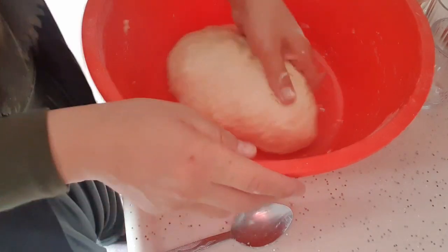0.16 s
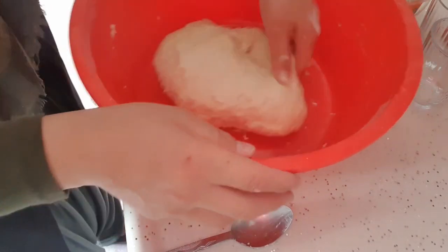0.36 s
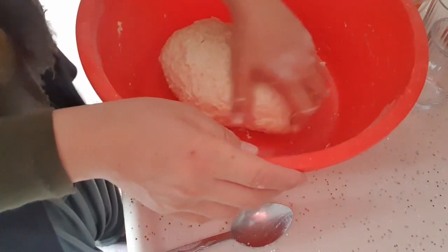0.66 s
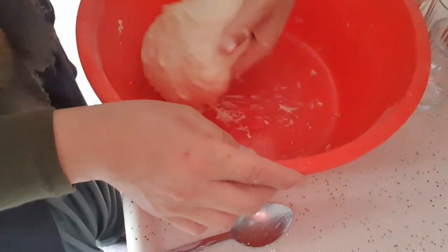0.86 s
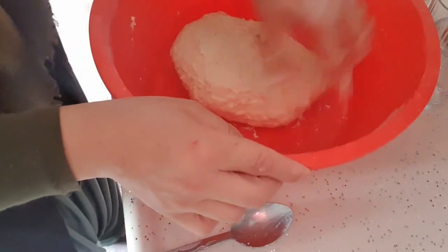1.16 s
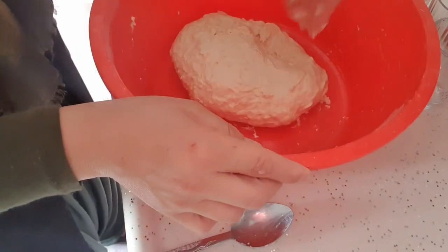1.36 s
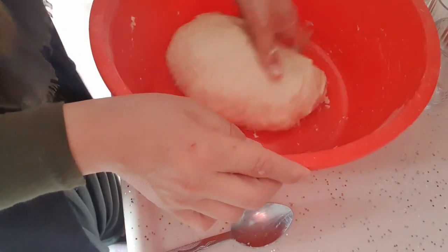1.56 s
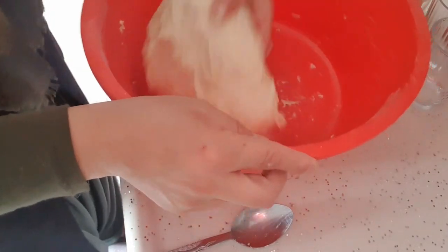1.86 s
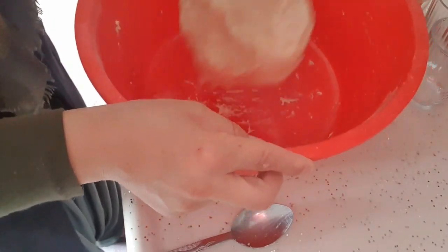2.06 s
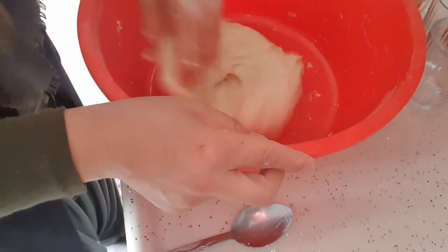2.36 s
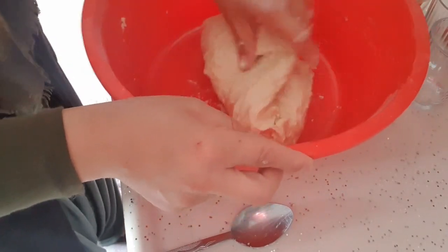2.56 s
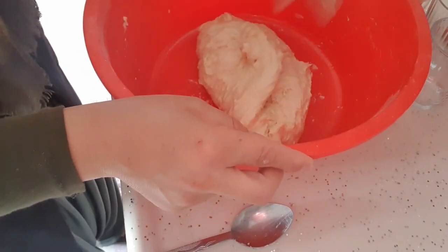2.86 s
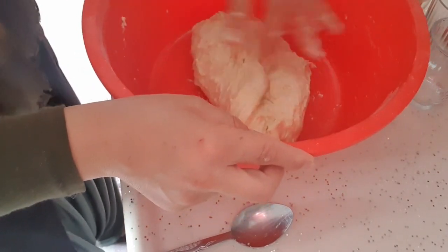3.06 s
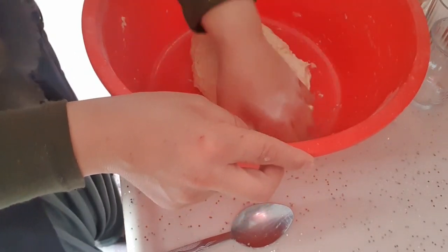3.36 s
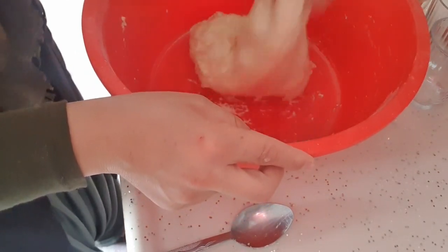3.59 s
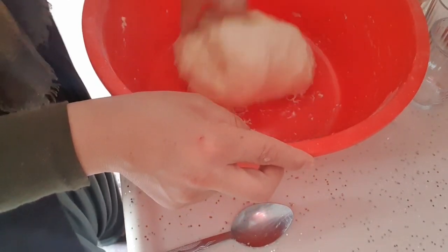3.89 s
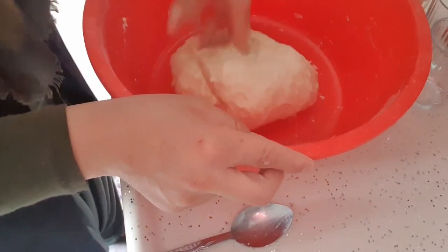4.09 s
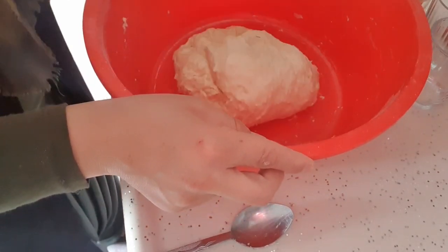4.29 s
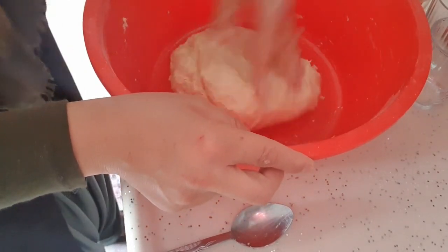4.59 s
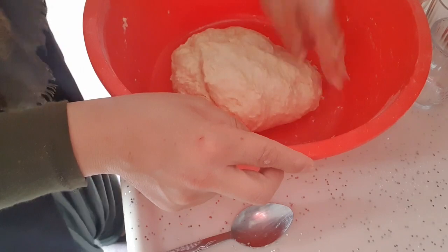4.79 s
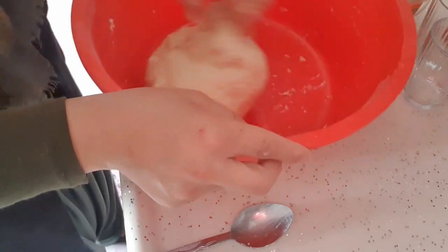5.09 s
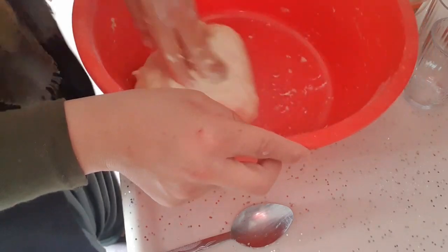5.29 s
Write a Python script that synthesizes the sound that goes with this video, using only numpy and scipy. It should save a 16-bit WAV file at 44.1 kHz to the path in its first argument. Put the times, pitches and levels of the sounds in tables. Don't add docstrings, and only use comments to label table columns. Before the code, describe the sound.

Hands knead soft sticky dough in a plastic bowl: irregular wet slaps, hollow thuds and slick drags, fading to faint sticky ticks.

```python
import sys
import numpy as np
from scipy import signal
from scipy.fft import rfft, irfft, next_fast_len
from scipy.io import wavfile

SR = 44100
rng = np.random.default_rng(int(sys.argv[2]) if len(sys.argv) > 2 else 0)


def volts(x):
    e = np.asarray(x, float) / 20
    return 10 ** e


def generate_wav(sig):
    pcm = np.round(np.clip(np.atleast_2d(sig).T, -1, 1) * 32767).astype(np.int16)
    wavfile.write(sys.argv[1], SR, pcm)


N = 239859


def rms_one(x):
    return x / np.sqrt(np.mean(x ** 2) + 1e-20)


def panned(level_db, pan_db):
    return volts(level_db + np.outer([.5, -.5], pan_db))


def coloured(x, points):
    hz, level_db = np.transpose(points)
    size = next_fast_len(N)
    grid_hz = np.arange(size // 2 + 1) * SR / size + 1
    gain = volts(np.interp(np.log(grid_hz), np.log(hz), level_db))
    return irfft(rfft(x, size) * gain, size)[..., :N]


def drift(rate):
    r = np.exp(-80 * np.pi * rate / SR)
    slow = signal.lfilter([1], [1, -2 * r, r * r], rng.standard_normal(N // 40 + 2002))
    slow = rms_one(slow[2000:])
    return np.interp(np.arange(N) / 40, np.arange(len(slow)), slow)


def ring(x, hz, t60):
    r, w = volts(-60 / (t60 * SR)), 2 * np.pi * hz / SR
    return signal.lfilter([0, np.sin(w)], [1, -2 * r * np.cos(w), r * r], x + 1e-18)


def resonance(x, hz, width_hz):
    r, w = np.exp(-np.pi * width_hz / SR), 2 * np.pi * hz / SR
    return signal.lfilter([(1 - r * r) / 2, 0, (r * r - 1) / 2], [1, -2 * r * np.cos(w), r * r], x + 1e-18)


def pair(alike):
    mid, side = rng.standard_normal((2, N))
    alike = np.clip(alike, 0, 1)
    return np.sqrt(alike) * mid + np.sqrt(1 - alike) * side * np.array([[1], [-1]])


def struck(events, column, modes, contact_s, spread_db, trim_db, pitch_column=None, narrow_db=0., wide=1.):
    hits = np.array(events)
    out = np.zeros((2, N))
    chance = rng.standard_normal((40, len(modes), 3))[:len(hits)]
    push = np.hanning(int(contact_s * SR) + 3)
    for k, (hz, level_db, t60) in enumerate(modes):
        strength, side, delay = chance[:, k].T
        octaves_away = np.abs(np.log2(hz / hits[:, pitch_column])) if pitch_column else 0
        level = hits[:, column] + level_db + trim_db - narrow_db * octaves_away + spread_db * strength
        at = ((hits[:, 0] + .4 * np.abs(delay) / hz) * SR).astype(int)
        clicks = np.zeros((2, N))
        clicks[:, at] = panned(level, wide * (hits[:, -1] + 2.3 * side))
        out += ring(clicks, hz, t60)
    return signal.lfilter(push / push.sum(), [1], out)


# (time [s], floor boom [dB], worktop [dB], floor overtones [dB], left-right [dB])
FLOOR_BLOWS = [(0.094, -29, -42, -50.5, -7), (0.128, -50.5, -34.5, -60.5, 0.5),
               (0.282, -13.5, -42.5, -21.5, -10), (0.317, -28, -37.5, -26.5, 4),
               (0.38, -41, -51.5, -40.5, -3), (0.551, -40.5, -60.5, -69, 2), (0.695, -36, -44, -61.5, 7),
               (1.015, -18, -39, -34.5, 6.5), (1.067, -38, -39.5, -46.5, -11),
               (1.138, -37, -44.5, -56.5, -5.5), (1.525, -21.5, -38, -17.5, 2), (1.54, -25, -32.5, -19, -1),
               (1.555, -15.5, -49.5, -19.5, 2), (2.288, -35, -44, -51, -3), (2.408, -30, -29, -36.5, 0),
               (2.43, -36, -28.5, -33, 8), (2.55, -51, -34, -48.5, 1), (2.991, -49, -53, -58.5, -1),
               (3.321, -24, -30, -45, -4), (3.5, -48, -55.5, -57, -0.5), (4.209, -53, -61.5, -54.5, 1.5),
               (4.461, -48, -45.5, -44.5, 4.5), (4.482, -41.5, -54, -56, 0), (4.902, -38, -36, -50, -5)]
# (frequency [Hz], level [dB], t60 [s])
WORKTOP_MODES = [(47.2, -12, 0.34), (67.7, 0.5, 0.21)]
# (frequency [Hz], level [dB], t60 [s])
FLOOR_MODES = [(117.49, -4, 0.28), (138.58, 3.5, 0.19), (154, 6, 0.11), (220, 2.5, 0.16), (262, -6.5, 0.11),
               (296.3, -2.5, 0.068), (327.2, -3.5, 0.055), (358.3, -5, 0.14)]


def thuds():
    worktop = struck(FLOOR_BLOWS, 2, WORKTOP_MODES, 0.0082, 2.2, 4.7, wide=.1)
    boom = struck(FLOOR_BLOWS, 1, FLOOR_MODES[:3], 0.0022, 2.4, -7.0, wide=.15)
    overtones = struck(FLOOR_BLOWS, 3, FLOOR_MODES[3:], .0015, 3.3, -1.0, wide=.5)
    return worktop + boom + overtones


# (time [s], wall [dB], strongest pitch [Hz], wet smack [dB], left-right [dB])
WALL_HITS = [(0.094, -24, 564.3, -41.5, 4.5), (0.282, -16, 750, -30.5, 2.5), (0.317, -28, 486, -46, 3.5),
             (0.3805, -26, 789, -41, 9), (0.402, -29.5, 1247, -41.5, 3.5), (0.4185, -28, 1174, -45, 8.5),
             (0.715, -38, 1132, -40, -1.5), (0.74, -49, 687, -40.5, 4), (1.0145, -18.5, 451.4, -31, 4.5),
             (1.511, -28, 1200, -43, 4), (1.524, -23, 461, -40, 10), (1.5405, -18, 700, -37, -3),
             (1.554, -17, 833, -34, 4), (1.564, -16, 716, -37, 5), (1.891, -41, 737, -48.5, -0.5),
             (2.286, -41.5, 1243, -62, 4.5), (2.409, -12, 989.6, -21, 8), (2.413, -11, 490, -28, -0.5),
             (2.442, -24, 1000, -37, 1.0), (2.992, -51, 472, -57.5, 4.5), (3.32, -39, 800, -62, 2),
             (3.351, -41, 580, -56, 5.5), (4.46, -46, 600, -60, 3.5), (4.909, -56, 500, -64, 0.5)]
# (frequency [Hz], level [dB], t60 [s])
WALL_MODES = [(474, -1.5, 0.066), (598, -4, 0.12), (743.5, -5, 0.092), (816, 0, 0.0708), (875, -2, 0.028),
              (1006.1, 1.5, 0.042), (1222.2, 1.5, 0.045), (1337.3, 0.5, 0.054), (1529, -1, 0.069),
              (1660, -2, 0.05), (1830, -6, .04), (2060, -7, .045), (2360, -6, .045), (2740, -10, .04)]


def wall_knocks():
    return struck(WALL_HITS, 1, WALL_MODES, .0004, 2.2, -14.5, pitch_column=2, narrow_db=6.0, wide=0.63)


def air_pops():
    out, t = np.zeros((2, N)), np.arange(900) / SR
    for s, db, hz, _, pan_db in WALL_HITS:
        cycles = hz * t
        swell = cycles / 1.3 * np.exp(1 - cycles / 1.3)
        at = int(s * SR)
        out[:, at:at + 900] += panned(db - 7.0, pan_db) * np.sin(2 * np.pi * cycles) * swell
    return out


def smack_burst(shape, burst_s, trim_db):
    hits = np.array(WALL_HITS)
    starts = np.zeros((2, N))
    starts[:, (hits[:, 0] * SR).astype(int)] = panned(hits[:, 3] + trim_db, hits[:, -1])
    fall, rise = np.exp(-1 / (burst_s * SR)), np.exp(-1 / (.0007 * SR))
    envelope = signal.lfilter([1], [1, -fall], starts)
    burst = signal.lfilter([1 - rise], [1, -rise], envelope) * pair(0.54)
    out = 0
    for k, (hz, width_hz, db) in enumerate(shape):
        band = resonance(resonance(burst, hz, width_hz), hz, 2 * width_hz)
        out = out + volts(db) * band * (-1) ** k
    return out


# (frequency [Hz], width [Hz], level [dB])
SMACK_BANDS = [(1600, 720, 2), (2200, 700, 2), (2650, 960, 3), (3300, 1100, -3), (4260, 2200, -10),
               (5519, 1400, -9.5), (6400, 900, -6.5)]


def smacks():
    body = smack_burst(SMACK_BANDS, burst_s=0.004, trim_db=16.5)
    return body + smack_burst([(10500, 5000, 0.0081)], burst_s=0.0032, trim_db=-9.5)


# (time [s], level [dB], pitch [Hz], t60 [s], left-right [dB])
HOLLOWS = [(0.2855, -20, 1190, .03, 2), (0.289, -24, 1690, .03, 2), (0.404, -34, 1240, .04, 3),
           (0.419, -27, 1150, .04, 6), (0.44, -40, 1500, .04, 4), (1.0145, -24, 1250, .03, 3),
           (1.023, -28, 800, .04, 3), (1.526, -26, 1150, .04, 4), (1.5408, -6, 830, .03, -2),
           (1.5415, -14, 640, .06, 2), (1.549, -18, 800, .03, 1), (1.5548, -8, 840, .03, 3),
           (1.556, -18, 650, .06, 0), (1.559, -20, 1350, .03, 3), (2.4112, -3, 1000, .014, 0),
           (2.4125, -21, 1030, .05, 3), (2.412, -15, 440, .035, 1), (2.4105, -20, 2360, .035, 0),
           (2.421, -22, 1640, .04, -2), (2.426, -26, 2500, .03, 0), (2.4105, -24, 6400, .012, 2),
           (0.2835, -15, 400, .05, 2), (1.5415, -22, 1600, .03, 0), (1.5555, -22, 1550, .03, 2),
           (1.572, -25, 1400, .02, 2), (1.579, -29, 2500, .025, 2), (4.463, -44, 780, .05, 2),
           (4.484, -43, 500, .07, 1), (2.416, -18, 790, .06, -1), (2.418, -18, 1430, .04, 2),
           (5.01, -50, 1250, .05, 1), (5.032, -49, 1400, .05, 1), (5.052, -52, 1250, .06, 1),
           (5.103, -51, 1300, .04, 1)]


def pockets():
    out, t = np.zeros((2, N)), np.arange(4000) / SR
    for s, db, hz, t60, pan_db in HOLLOWS:
        at = int(s * SR)
        note = np.sin(2 * np.pi * hz * t) * (1 - np.exp(-t * hz)) * volts(db - 60 * t / t60)
        out[:, at:at + 4000] += note * panned(0, pan_db)
    return out


# (time [s], level [dB], pitch [Hz], ring width [share of pitch])
STRANDS = [(0.2056, -42, 1680, .2), (0.4185, -28, 3500, .6), (0.442, -34, 2600, .15),
           (0.8534, -38, 3130, .08), (0.9364, -46, 1840, .12), (1.0155, -30, 5410, .12),
           (1.0165, -28, 3200, .15), (1.565, -26, 2450, .12), (1.7755, -36, 3780, .18),
           (2.656, -60, 7000, .5), (2.7194, -62, 5500, .4), (2.7862, -56, 4500, .5),
           (2.942, -58, 2300, .18), (2.9776, -55, 1500, .3), (3.6287, -60, 4510, .3),
           (3.6745, -63, 4900, .3), (3.7249, -63, 5940, .3), (3.7498, -58.5, 13500, .18),
           (3.776, -65, 5000, .3), (3.81, -60, 11000, .6), (3.8385, -61, 9000, .8), (3.8576, -63, 4500, .4),
           (3.8969, -59, 6140, .08), (3.9515, -59, 12500, .3), (3.979, -54, 12300, .15),
           (3.9958, -54, 6420, .15), (4.0262, -54, 4300, .25), (4.0285, -48, 11900, .3),
           (4.046, -53, 4500, .4), (4.057, -54, 6000, .6), (4.084, -54, 11500, .15),
           (4.0925, -51, 4800, .35), (4.1634, -50, 4000, .25), (4.1899, -52, 4407, .2),
           (4.463, -38, 5000, .2), (4.5442, -53, 4800, .3), (4.578, -54, 12500, .3),
           (4.6015, -53, 11500, .4), (4.6325, -50, 12300, .3), (4.6745, -46, 11400, .35),
           (4.675, -52, 5900, .15), (5.0136, -47, 2920, .2), (5.104, -50, 4300, .2),
           (5.117, -47, 7200, .25), (5.137, -50, 4800, .12), (5.285, -62, 7000, .4),
           (5.3952, -63, 5620, .3), (5.4244, -63.5, 2190, .18)]


def ticks():
    out, t = np.zeros((2, N)), np.arange(400) / SR
    sides_db = rng.normal(1.5, 1.2, 60)
    for (s, db, hz, width_share), pan_db in zip(STRANDS, sides_db):
        width_hz = width_share * hz
        snap = np.sqrt(width_hz / 600.) * np.sin(2 * np.pi * hz * t) * np.exp(-np.pi * width_hz * t)
        at = int(s * SR)
        out[:, at:at + 400] += panned(db - 1.5, 2 * pan_db) * snap[:N - at]
    return out


# (time [s], wall drag [dB], oily hiss [dB], floor drag [dB], time to fade 60 dB [s])
SKID_STROKES = [(0.0, -65.5, -68, -85.5, 0.89), (0.093, -31, -46.5, -57.5, 0.4244),
                (0.285, -30, -44.5, -27.5, 0.3149), (0.381, -40, -42.5, -53, 0.2),
                (0.704, -57, -59, -71.5, 0.41), (0.715, -45, -48.5, -74.5, 0.3328),
                (1.009, -49.5, -52.5, -53, 0.3276), (1.016, -34, -55.5, -32.5, 0.2938),
                (1.511, -44, -56, -66.5, 0.39), (1.531, -30, -42, -28, 0.5573),
                (2.289, -51, -80, -53.5, 0.32), (2.407, -44, -52, -50, .5), (2.412, -29, -36, -29, 0.4206),
                (2.99, -65.5, -57.5, -62.5, 0.1334), (3.325, -54, -78.5, -46, 0.6743),
                (3.355, -53.5, -56, -58.5, 0.5738), (4.205, -76, -72.5, -58, 0.31),
                (4.462, -56, -56, -42, .4), (4.902, -66, -62, -65, .3), (4.909, -65, -59, -55, 0.6),
                (4.63, -85, -84, -59, 0.91), (5.329, -70, -79.5, -65, 0.72)]
# (peak time [s], swell [s], wall drag [dB], peel fizz [dB], time to fade 60 dB [s])
PEEL_STROKES = [(0.249, 0.083, -46.5, -60.5, 0.4371), (0.431, 0.069, -39, -68, 0.1954),
                (0.67, .04, -70, -98, .4), (0.882, 0.094, -50.5, -64.5, 0.4727), (0.99, .04, -57, -78, .3),
                (1.078, 0.05, -48, -64.5, 0.448), (1.166, 0.0694, -48.5, -67, .24),
                (1.28, .05, -70, -100, .4), (1.567, 0.0263, -36.5, -50, 0.3829),
                (1.72, .1, -55, -62.5, 0.6046), (1.9, 0.126, -52.5, -70, 0.5353),
                (2.62, .12, -62.5, -76, 0.45), (2.794, .02, -75, -85, 0.54), (3.09, .06, -66, -88, .3),
                (3.096, 0.0599, -76, -67, 0.2768), (3.501, 0.0404, -52.5, -69, 0.2437),
                (3.62, 0.104, -75, -77.5, 1.5), (4.011, 0.0486, -75, -71.5, 1.06),
                (4.09, 0.0518, -61, -70, 0.336), (4.21, 0.178, -82, -72, 0.13), (4.48, .02, -70, -68, .5),
                (4.675, 0.099, -68.5, -67.5, 0.273), (5.061, 0.0979, -53, -64, 0.578),
                (5.139, 0.086, -65, -67.5, 0.33), (5.43, 0.034, -83.5, -74.5, 0.14)]
# (wall [dB], hiss [dB], fizz [dB], floor [dB])
REST_DB = (-99, -101, -105, -84)


def strokes():
    t = np.arange(0, N / SR, .001)
    power = volts(2 * np.array(REST_DB))[:, None] * np.ones(len(t))
    faster = np.array([[1], [1], [1], [1.3]])
    for s, wall_db, hiss_db, floor_db, t60 in SKID_STROKES:
        fade_db = 60 * np.maximum(t - s, 0) / t60 * faster
        levels_db = np.array([[wall_db], [hiss_db], [hiss_db - 17], [floor_db]])
        power += (t >= s) * volts(2 * (levels_db - fade_db))
    for s, swell_s, wall_db, fizz_db, t60 in PEEL_STROKES:
        away_db = np.where(t < s, 10 * ((s - t) / swell_s) ** 2, 60 * (t - s) / t60)
        hiss_db = fizz_db + .55 * (wall_db - fizz_db) + 2
        levels_db = np.array([[wall_db], [hiss_db], [fizz_db], [wall_db - 20]])
        power += volts(2 * (levels_db - away_db))
    return [np.interp(np.arange(N) / SR, t, gain) for gain in np.sqrt(power)]


def grains(per_s, size_db):
    sizes = volts(size_db * np.minimum(rng.exponential(1, N), 5))
    return rms_one(sizes * (rng.random(N) < per_s * volts(4 * drift(15)) / SR))


def crackle():
    snaps = grains(260, size_db=3.0) * pair(.6)
    low = resonance(resonance(snaps, 5400, 3000), 5400, 5000)
    high = resonance(resonance(snaps, 12500, 6000), 12500, 9000)
    return rms_one(low + 0.43 * high)


# (frequency [Hz], level [dB per Hz])
FILM_HISS = [(1500, -10.5), (2100, 0), (4600, -1), (6800, -7.5), (9000, -25)]


def slide():
    wall_gain, hiss_gain, fizz_gain, floor_gain = strokes()
    drag_top, hiss_top = volts(-37), volts(-45)
    grip = (1 + .3 * grains(1500, size_db=1.5)) * volts(1.5 * drift(30))
    slips, low_slips = pair(.7) * grip, pair(0.82) * grip
    wall, floor = 0, 0
    for hz, db, t60 in WALL_MODES[1:]:
        wall = wall + volts(db + 3.0 * drift(7.3)) * ring(slips, hz, 0.25 * t60)
    for hz, db, t60 in FLOOR_MODES[3:] + WALL_MODES[:1]:
        floor = floor + ring(low_slips, hz, 0.15 * t60)
    film = pair(.55) * (1.0 + 0.4 * grains(360, size_db=-2.5)) * volts(1.4 * drift(40))
    hiss = coloured(film, [(600, -41.5)] + FILM_HISS + [(12000, -39)])
    fizz = coloured(film, [(5000, -39.5), (8500, -3), (12000, 2.5), (15500, -3)])
    out = drag_top * np.tanh(wall_gain / drag_top) * rms_one(wall)
    out += drag_top * np.tanh(floor_gain / drag_top) * rms_one(floor)
    out += hiss_top * np.tanh(hiss_gain / hiss_top) * rms_one(hiss)
    return out + fizz_gain * (volts(3.5) * rms_one(fizz) + .2 * crackle())


# (start [s], end [s], pitch [Hz], width [Hz], level [dB])
RUBS = [(0, 0.107, 1541, 196, -65), (1.87, 2.179, 1260, 140, -73), (4.04, 4.14, 791, 160, -71),
        (4.16, 4.25, 800, 200, -74), (4.06, 4.12, 1400, 500, -66), (4.12, 4.16, 5800, 2200, -66),
        (4.13, 4.24, 4200, 1500, -70), (3.91, 3.95, 6100, 900, -82), (4.62, 4.79, 3600, 260, -77),
        (4.63, 4.795, 4560, 250, -78), (4.535, 4.55, 12800, 700, -72), (4.535, 4.55, 14800, 600, -72),
        (5.03, 5.09, 3000, 1600, -62), (4.93, 5.0, 1800, 500, -66), (4.5, 4.74, 773.4, 180, -71)]


def squeaks():
    out, rub = np.zeros((2, N)), pair(0.637) * volts(2.5 * drift(25))
    for start, end, hz, width_hz, db in RUBS:
        span = slice(max(int((start - .04) * SR), 0), int(end * SR))
        t = np.arange(N)[span] / SR
        tone = rms_one(resonance(resonance(rub[:, span], hz, width_hz), hz, width_hz))
        fade = np.clip(np.minimum(t - start + 0.0279, end - t) / 0.0372, 0, 1)
        out[:, span] += volts(db) * tone * fade
    return out


# (frequency [Hz], t60 [s], level [dB])
ROOM_BANDS = [(95.6, 0.43, -20), (324, 0.4193, -11.5), (1510, 0.4014, -8.5), (5000, 0.43, -11.5),
              (12000, 0.37, -10)]


def kitchen(x, first_s):
    t, answer = np.arange(SR // 2) / SR, 0
    for hz, t60, level_db in ROOM_BANDS:
        noise = pair(.5 + .5 * np.exp(-(hz / 700.0) ** 2))[:, :len(t)]
        octaves = signal.butter(2, [hz / 2, min(hz * 2, 20000)], "band", fs=SR, output="sos")
        answer = answer + signal.sosfilt(octaves, noise) * volts(level_db - 25 - 60 * t / t60)
    return signal.fftconvolve(x.mean(0, keepdims=True), answer * (t > first_s), axes=1)[:, :N]


# (frequency [Hz], width [Hz], level
# [dB])
HUM_LINES = [(41.3, 11, -10), (49.42, 5.2, -2), (76.3, 20, -14), (101.5, 10, -2.5), (136.9, 15, -12),
             (295.8, 25, -25), (598, 25, -34)]


def hum():
    t, lines, motor = np.arange(N) / SR, 0, pair(0.987)
    for hz, width_hz, db in HUM_LINES:
        band = rms_one(resonance(resonance(motor, hz, width_hz), hz, width_hz))
        lines = lines + volts(db) * (band + 9.7 / width_hz * np.sin(2 * np.pi * hz * t))
    return volts(-52.5 + 0.8 * drift(2.5)) * rms_one(lines)


# (frequency [Hz], level [dB])
QUIET_SPECTRUM = [(88, -36.5), (150, -3.5), (193, -14), (303, -18), (383, -20.5), (589, -24.5), (1080, -31),
                  (3420, -34.5), (7470, -46), (16000, -44)]


def quiet():
    return volts(-73 + 1.2 * drift(6)) * rms_one(coloured(pair(0.31), QUIET_SPECTRUM))


def scene():
    close = thuds() + wall_knocks() + air_pops() + smacks() + pockets() + ticks()
    return close + kitchen(close, first_s=0.0016) + slide() + squeaks() + hum() + quiet()


def band_limit(x):
    return signal.sosfilt(signal.butter(12, 16330, fs=SR, output="sos"), x)


def record(dry):
    dry = signal.sosfilt(signal.butter(6, 46, "high", fs=SR, output="sos"), dry)
    dry = signal.sosfilt(signal.cheby2(12, 60, 16400, fs=SR, output="sos"), dry)
    dip = (1 - volts(-6.5)) * resonance(dry, 7803, 2 * 470)
    return band_limit(dry - dip)


dry = scene()
out = record(dry)
generate_wav(out)
```